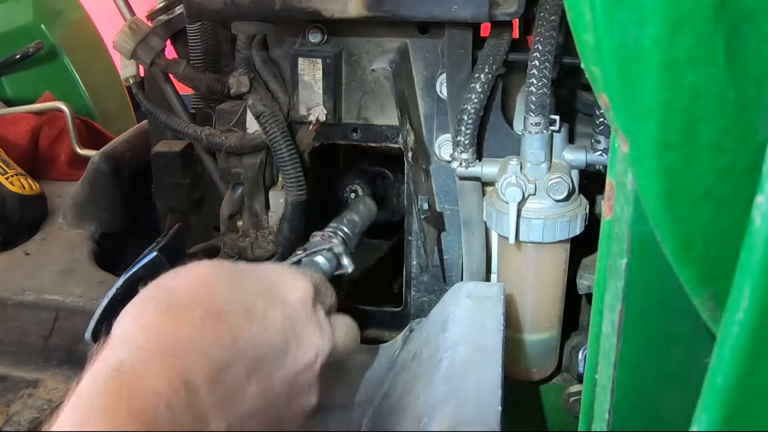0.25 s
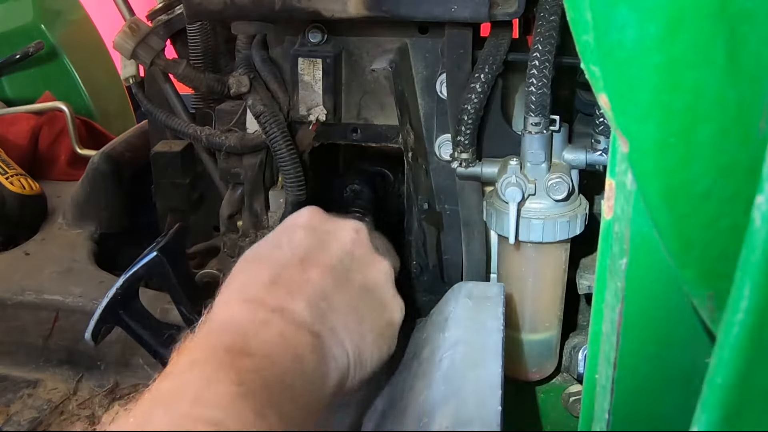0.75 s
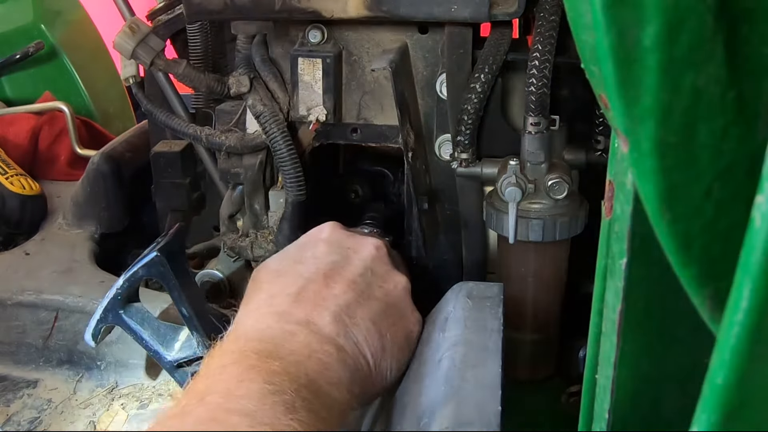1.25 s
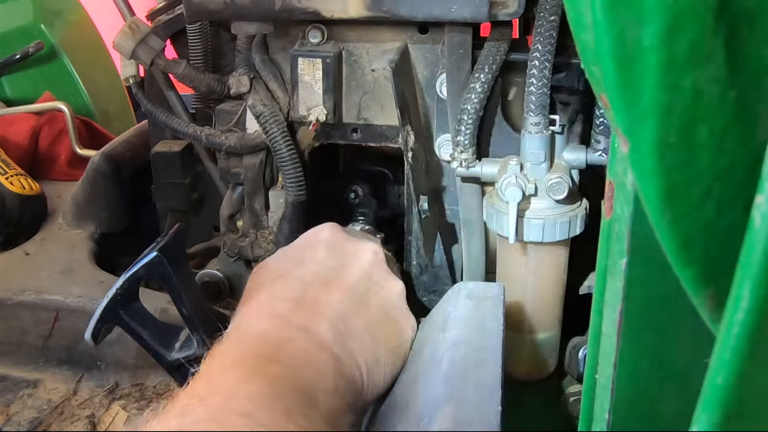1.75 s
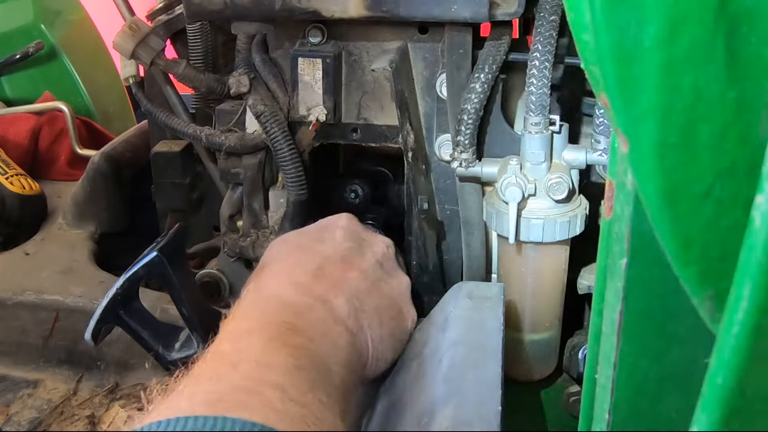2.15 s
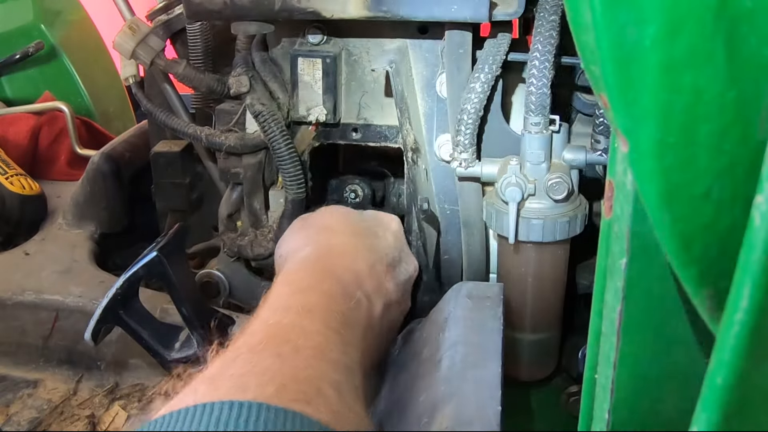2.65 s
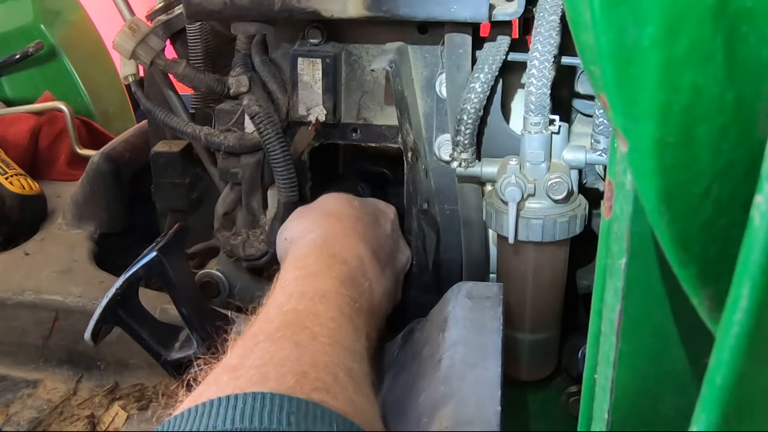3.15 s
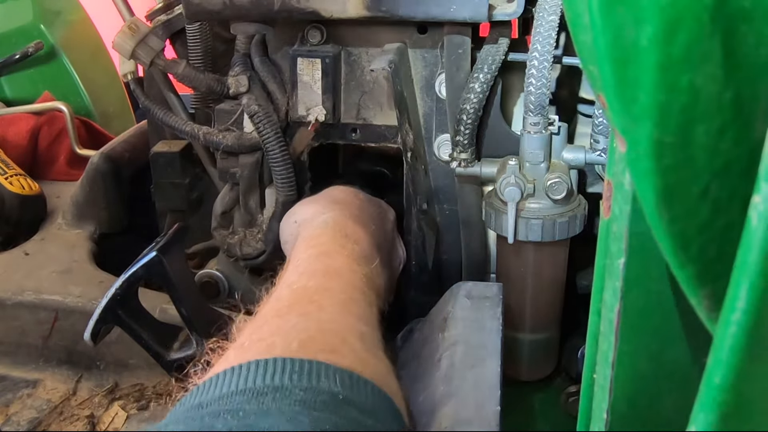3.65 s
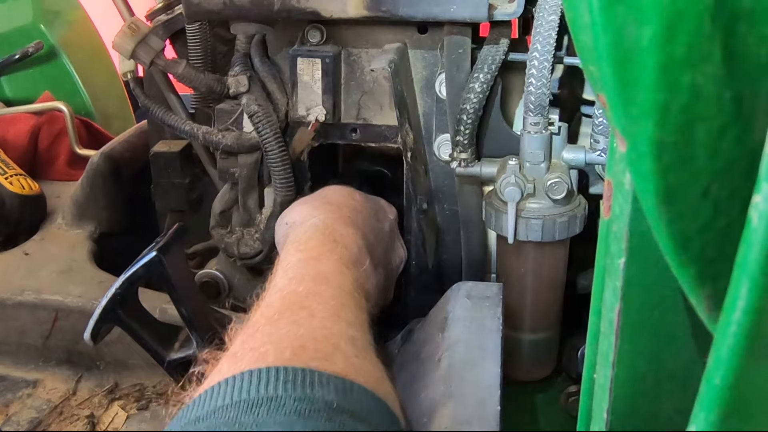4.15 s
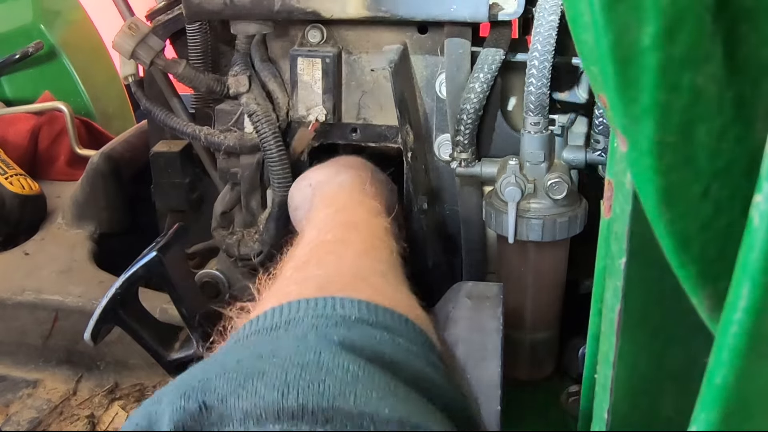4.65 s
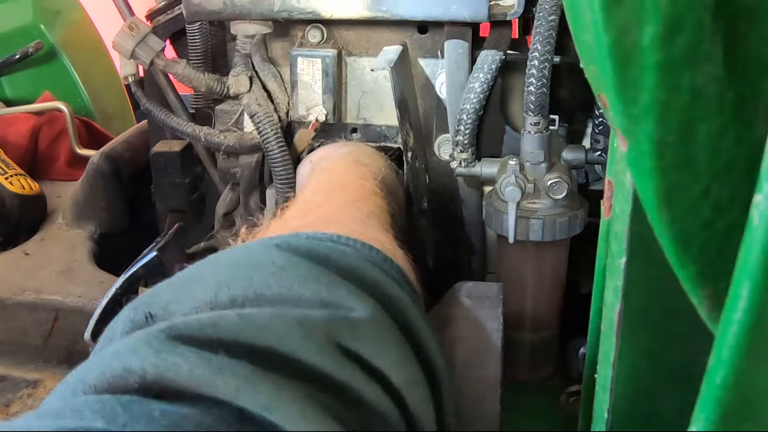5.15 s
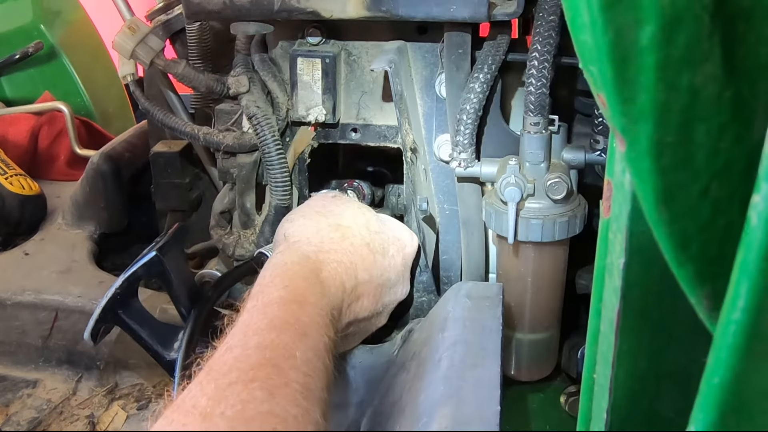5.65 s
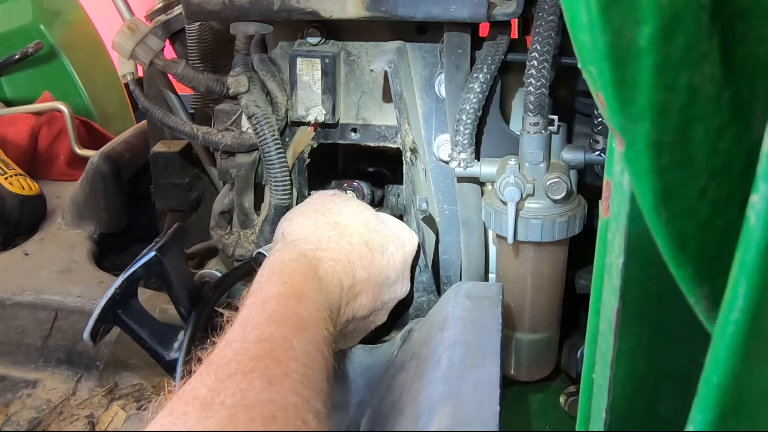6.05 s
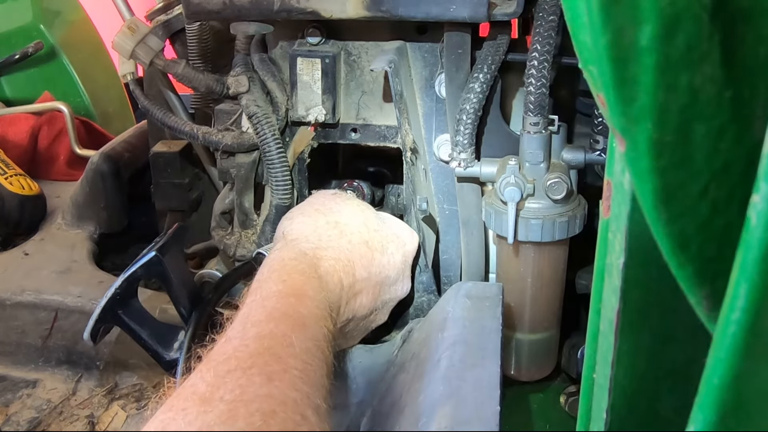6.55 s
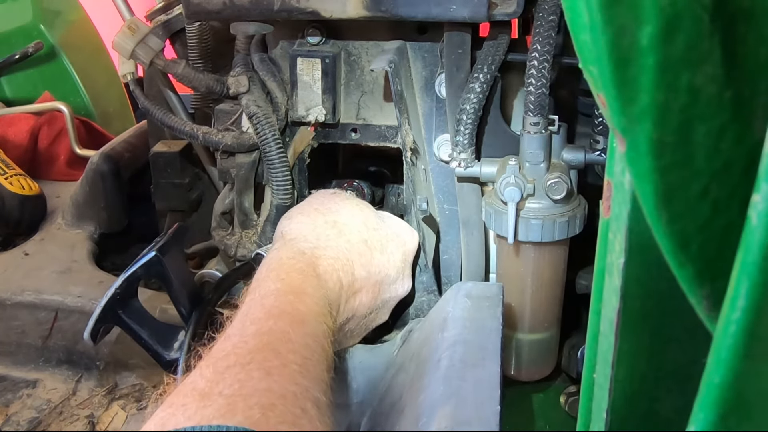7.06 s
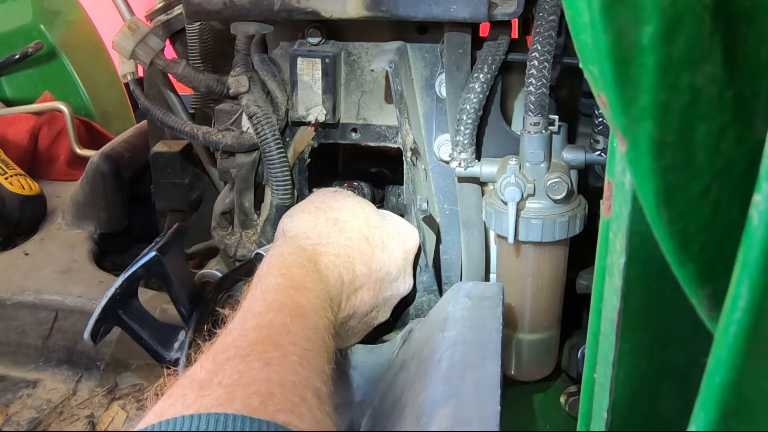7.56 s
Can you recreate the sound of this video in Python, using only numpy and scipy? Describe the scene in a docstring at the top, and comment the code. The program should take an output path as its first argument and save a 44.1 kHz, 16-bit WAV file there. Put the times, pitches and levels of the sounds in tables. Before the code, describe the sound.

Quiet sleeve and hose rustling with small metal ticks and one clank, then a battery grease gun rattles and whines in two bursts.

```python
"""Sleeve and hose rustle first, with small metal ticks, while a hand fits a grease coupler in a shed.
One clank rings the casting; then a battery grease gun runs twice, still going at the end.
Shaped noise makes the rub, rattle, knocks and air puffs; sines make the whine, squeals and casting.
Gears rattle in a plastic shell, the plunger knocks and squeals each stroke, the whine climbs as load eases.
Air puffs on the microphone ports over a far hum; the engine bay and the shed answer the gun and metal."""
import sys
import numpy as np
from scipy import signal
from scipy.fft import rfft, irfft, next_fast_len
from scipy.io import wavfile
from scipy.ndimage import uniform_filter1d, map_coordinates

SR = 44100
rng = np.random.default_rng(int(sys.argv[2]) if len(sys.argv) > 2 else 0)


def generate_wav(signal):
    """Clip the signal to [-1, 1] and save it as 16-bit WAV at the path in sys.argv[1]."""
    frames = np.transpose(np.atleast_2d(signal))
    scaled = np.clip(frames, -1, 1) * 32767
    pcm = np.round(scaled).astype(np.int16)
    wavfile.write(sys.argv[1], SR, pcm)


N = 343803  # samples

# Air puffs on the ports: t/s, level/dB
PUFF_LEVELS = [(0.0, -57), (0.04, -49), (0.13, -53), (0.28, -53), (0.43, -80), (0.87, -65), (0.91, -47.5),
               (1.23, -57), (1.28, -69.5), (2.54, -71.5), (2.89, -59.5), (2.97, -77), (3.03, -62.5),
               (3.32, -64), (3.36, -56), (3.84, -61.5), (3.88, -47), (4.04, -57), (4.1, -49.5), (4.23, -73),
               (4.32, -48.5), (4.45, -68), (6.01, -56.5), (6.12, -69), (6.16, -55), (7.05, -71),
               (7.16, -55.5), (7.68, -70), (7.75, -47), (7.79, -73)]
# Spectrum of the puffs: f/Hz, level/dB
PUFF_SPECTRUM = [(8.8, -27), (15, -7.5), (32, 1.5), (76, -1), (89, -2.5), (113, -19), (140, -4.5),
                 (180, -17.5), (230, -31), (310, -120)]
# Spectrum of the far hum of the yard: f/Hz, level/dB
HUM_SPECTRUM = [(59, -44), (100, -26), (117, -17), (157, -5), (252, -12.5), (289, -12), (325, -27),
                (345, -23), (502, -34), (804, -17.5), (998, -33.5), (1370, -23), (1700, -49), (3500, -46.5),
                (6860, -47), (9500, -55), (11000, -55.5), (14300, -85), (22000, -120)]
# Left-right likeness of the hum: f/Hz, likeness
HUM_ALIKE = [(60, 0.32), (240, 0.58), (950, -0.64), (3770, -0.17), (15000, -0.82)]
HUM_DB = -58.5
# Each dB above calm leans a puff this many dB to the right port, up to a limit
CALM_DB, LEAN, MOST_DB = -70.5, .55, 12

# Sleeve and hose rubbing, two spells: t/s, dull rub level/dB, fine rustle level/dB
RUB_SPELLS = [
    [(0, -58.5, -63.5), (.12, -59.5, -60), (.3, -62.5, -65), (.46, -57.5, -59), (.56, -56.5, -59.5),
     (.585, -43.5, -50.5), (.64, -52.5, -52.5), (.74, -55, -61), (.85, -66.5, -72), (.91, -54, -62.5),
     (1.03, -68, -76.5), (1.12, -57, -72)],
    [(1.27, -60, -59), (1.5, -65.5, -73), (1.72, -55.5, -58), (1.88, -60, -65), (2.02, -56, -58.5),
     (2.16, -58, -58), (2.22, -63, -68), (2.37, -58.5, -57), (2.52, -65, -63.5), (2.65, -61.5, -63.5),
     (2.82, -55.5, -58), (2.93, -61, -66), (2.965, -45.5, -47), (3.05, -65, -70.5), (3.18, -64.5, -77),
     (3.27, -60.5, -66.5), (3.33, -67, -74), (3.38, -64, -67), (3.43, -68, -75), (3.55, -69, -75),
     (3.6, -65, -66), (3.7, -67, -74), (3.8, -67.5, -78), (3.87, -71, -72), (3.95, -77, -81),
     (4.22, -73.5, -83.5), (4.4, -71.5, -73.5), (4.6, -60.5, -69), (4.79, -69.5, -74), (4.86, -57.5, -53.5),
     (4.96, -68, -71), (5.08, -71.5, -83.5), (5.28, -72, -82)],
]
# Spectrum of the dull rub: f/Hz, level/dB
DULL_SPECTRUM = [(150, -25), (250, 2.5), (443, 4.5), (481, -3), (753, -0.5), (1180, -1.5), (1360, 0),
                 (1920, -8.5), (3000, -17.5), (3900, -31.5), (6600, -120)]
# Spectrum of the fine rustle: f/Hz, level/dB
FINE_SPECTRUM = [(880, -1), (1500, -11.5), (1930, -0.5), (2830, -2.5), (4220, -5), (5420, -8.5), (6620, -8),
                 (7190, -14.5), (9790, -14), (11000, -23), (12500, -29), (14300, -48.5), (22000, -120)]
# Left-right likeness of the rubbing: f/Hz, likeness
RUB_ALIKE = [(60, 0.75), (180, 0.92), (550, 0.47), (1650, 0.049), (4970, 0.53), (15000, -0.63)]
# Faint late stir of the sleeve: from t/s, to t/s, dull level/dB, fine level/dB
SLEEVE_STIR = (6, 17, -75.5, -80)

# Metal ticks of the coupler: t/s, level/dB, centre f/Hz
METAL_TICKS = [(.127, -51, 900), (.195, -57, 5160), (.338, -52, 700), (.472, -54, 1280),
               (0.572, -42.5, 1210), (0.885, -53, 1920), (1.077, -59, 970), (1.48, -54, 870),
               (1.698, -55, 6100), (1.722, -53, 7400), (2.025, -55, 4000), (2.813, -58, 4940),
               (2.954, -44.5, 1500), (2.964, -41.5, 3620), (2.975, -52, 860), (3.073, -57, 3660),
               (3.138, -66, 4000), (3.153, -63, 4960), (3.207, -65, 3000), (3.227, -59, 2190),
               (3.305, -62, 3150), (3.456, -59, 4640), (3.566, -36, 3520), (3.58, -52, 2320),
               (3.623, -46.5, 2260), (3.835, -67, 6500), (4.564, -50.5, 3340), (4.575, -57, 2000),
               (4.813, -58, 4000), (5.028, -59.5, 4300), (6.972, -65, 4000), (1.128, -52, 3000)]
# Coupler striking the casting: t/s, reference level/dB for ring and contacts
COUPLER_CLANK = [(1.1378, -11)]
# Ringing modes of the casting: f/Hz, level/dB, t60/s
CASTING_MODES = [(152.2, -3.5, .12), (406.5, 5.5, 0.064), (850, 0, .05), (1140, 3.5, 0.068),
                 (1450, 0, 0.14), (2474, -2.5, .06), (3360, -9, .04)]
# Spectrum of the gritty contact: f/Hz, level/dB
CONTACT_SPECTRUM = [(100, -18), (200, -3), (500, 2.5), (900, 7), (1400, 4), (2500, 1), (4500, -11.5),
                    (8000, -29), (15000, -56)]
# Chatter after the blow: delay t/s, relative level/dB
COUPLER_RATTLES = [(.004, -6.5), (0.016, -16), (0.027, -20.5), (.055, -22)]
TICK_S, TICK_CYCLES = 0.014, 23  # tick t60 = a shortest time (s) plus some cycles
CLEAR = 0.38  # share of clear ring in a tick
CONTACT_S = .03  # t60 (s)

# Trigger held: from t/s, to t/s, gear rattle level/dB, trigger click level/dB, faint start relative level/dB
TRIGGER_RUNS = [(5.306, 6.64, -31, -21.5, -13), (7.324, 7.9, -31, -36, -11)]
# Resonances of the plastic shell: f/Hz, width f/Hz, level/dB
SHELL_MODES = [(1030, 530, -7.5), (982, 200, -8.5), (1765, 60, -1.5), (2175, 110, -2.5), (2516, 110, 0),
               (3210, 450, 2), (3860, 190, -6), (4980, 90, -1.5), (5560, 46, -7.5), (6810, 180, -4),
               (8150, 120, -5), (9900, 150, 0)]
# Spectrum of the gear rattle: f/Hz, level/dB
GEAR_SPECTRUM = [(240, -30.5), (400, -13), (816, -4), (964, 2), (1880, -7), (2150, -5), (2790, -9),
                 (3240, -8), (4390, -8), (5600, -7.5), (6710, -7.5), (7700, -14.5), (10400, -17.5),
                 (15000, -37)]
# Rattle through one stroke: share of stroke, level/dB, treble relative level/dB
STROKE_GRIND = [(0, -1, 0), (.15, -4, 2), (.3, -0.5, -3), (.6, -1.5, -4.5), (.9, -0.5, -3.5), (1, -5, 1)]
# Whine through one stroke: share of stroke, shaft f/Hz, shaft level/dB, 12th and 15th order level/dB
STROKE_WHINE = [(0, 345, -51, -40, -58), (.1, 341, -56, -54, -58), (.3, 318, -58, -60, -56),
                (.47, 326, -50, -58, -43), (.6, 332, -47, -48, -39), (.72, 337, -46, -37, -43),
                (.8, 340, -46, -39, -48), (.9, 345, -47, -34, -54), (1, 345, -51, -40, -58)]
# Plunger turns: t/s, knock level/dB, squeal level/dB, first f/Hz, second f/Hz, length of each squeal t/s
PLUNGER_TURNS = [(5.409, -43.5, -28.5, 4786, 4790, 0.053), (5.644, -10, -29.5, 5780, 5220, 0.037),
                 (5.869, -8.5, -30.5, 5740, 5400, 0.026), (6.089, -7, -31, 5680, 5310, 0.035),
                 (6.307, -6.5, -33.5, 5580, 5350, 0.03), (6.526, -9.5, -32, 5700, 5210, 0.025),
                 (7.504, -8, -31.5, 5680, 5350, 0.034), (7.729, -10, -32.5, 5640, 5250, 0.038)]
# Slack in the drive knocking between turns: t/s, level/dB
SLACK_KNOCKS = [(5.383, -28.5), (5.741, -10.5), (5.775, -16), (5.934, -16), (5.959, -16.5), (6.018, -30),
                (6.058, -8), (6.152, -16.5), (6.177, -13.5), (6.361, -13.5), (6.586, -16), (7.574, -24.5),
                (7.708, -16)]
# Spectrum of the knocks: f/Hz, level/dB
KNOCK_SPECTRUM = [(260, -40), (360, -10.5), (700, -5.5), (1200, 2), (2200, -13), (4000, -19), (9000, -42)]
# Motor climbing to speed: t/s, length t/s, from f/Hz, to f/Hz, level/dB
MOTOR_RUN_UP = [(5.369, 0.031, 2873, 3860, -33), (7.365, .04, 2150, 2550, -36)]
SPIN_UP_S, START_DULL_DB, COAST_DB_PER_S = 0.047, -8, 597.5  # the rattle starts faint and dull, stops fast
FULL_SPEED_S = 0.18  # after the trigger
STROKE_S = .22
FLEX = .012  # the grip squeezes the shell: its resonances wander by this share either way
SQUEAL_LAG_S, SECOND_AT = .011, .6  # the second squeal starts at this share of the first
SAG = .008  # share of its pitch a squeal loses
THIN_HZ, THIN_DB = 6550, -8  # a thin high voice, relative to the squeal
TURN_S, SLACK_S = 0.062, .035  # t60 of the knocks (s)
CLATTER_DB, CLATTER_SPREAD_DB = -16, 12  # faint chance knocks: the loudest, the range below

# Dying time of the engine bay close by: f/Hz, t60/s
BAY_DECAY = [(200, 0.047), (1000, 0.035), (8000, 0.14)]
# Left-right likeness of the bay: f/Hz, likeness
BAY_ALIKE = [(250, 1), (600, 0), (2500, 0.1), (4000, -0.0056), (6000, -0.12), (10000, 0)]
# Dying time of the shed: f/Hz, t60/s
SHED_DECAY = [(200, 0.3), (500, .22), (1000, 0.29), (1800, .38), (3000, 0.49), (5000, .48), (8000, 0.36),
              (15000, 0.21)]
# Left-right likeness of the shed: f/Hz, likeness
SHED_ALIKE = [(200, 1), (600, 0.57), (3000, 0.2), (7000, 0)]
# Where gun and coupler are heard: f/Hz, left minus right level/dB
GUN_SIDE = [(60, -5), (150, 2), (380, -1), (950, -3), (2380, -0.5), (5980, -3), (15000, 5.5)]
# The arm shades the straight path of the rattle: f/Hz, level/dB
ARM_SHADE = [(300, 9), (800, -2), (2500, -2), (3600, -2), (5500, -5), (10000, -23)]
TAIL_CYCLE_S = .8  # several random echo tails take turns, coming round after this time, for an even reverberation
# Brief dip of the whole sound: from t/s, to t/s
BRIEF_DIP = (5.285, 5.294)
TOP_HZ = 15600


def amp(db):
    """Decibels to linear gain."""
    return 10 ** (np.asarray(db) / 20)


def unit(x):
    """Scale to rms 1."""
    return x / np.sqrt(np.mean(x ** 2) + 1e-20)


def along(points, hz):
    """Read (Hz, value) points on a log axis."""
    f, v = np.transpose(points)
    return np.interp(np.log(hz + 1), np.log(f + 1), v)


def curves(rows):
    """One value per sample for each column after the time."""
    s, *cols = np.transpose(rows)
    return [np.interp(np.arange(N) / SR, s, c) for c in cols]


def wobble(rate):
    """A smooth random curve, rate knots a second."""
    knots = rng.standard_normal(int(N * rate / SR) + 4)
    return map_coordinates(knots, [np.arange(N) * rate / SR])


def filtered(x, response):
    """Shape x by a response of frequency."""
    m = next_fast_len(N + SR // 2)
    return irfft(rfft(x, m) * response(np.fft.rfftfreq(m, 1 / SR)), m)[..., :N]


def causal(gain):
    """Minimum-phase response with this gain: it starts no earlier than the blow."""
    def response(hz):
        cep = irfft(np.log(gain(hz) + 1e-6))
        cep[1:len(cep) // 2] *= 2
        cep[len(cep) // 2 + 1:] = 0
        return np.exp(rfft(cep))
    return response


def paired(pair, alike):
    """Mix two unrelated signals to left and right of a given likeness."""
    def weights(hz):
        angle = np.arccos(np.clip(along(alike, hz), -1, 1)) / 2
        return np.array([np.cos(angle), np.sin(angle)])
    mid, side = filtered(pair, weights)
    return np.array([mid + side, mid - side])


def rush(spectrum, alike, grain_db, grain_rate, patchy_db):
    """Stereo noise of rms 1 that flickers in grains and in patches of time and pitch."""
    z = signal.stft(rng.standard_normal((2, N)), nperseg=512)[2]
    field = uniform_filter1d(rng.standard_normal(z.shape[1:]), size=5, axis=0)
    field = uniform_filter1d(field, size=10, axis=1)
    patchy = signal.istft(z * amp(patchy_db * unit(field)), nperseg=512)[1][:, :N]
    pair = patchy * amp(grain_db * wobble(grain_rate))
    coloured = filtered(pair, lambda hz: amp(along(spectrum, hz)))
    return unit(paired(coloured, alike))


def bursts(rows, t60s):
    """Noise that starts at once and dies exponentially, at each (s, dB)."""
    out, t = np.zeros(N + SR), np.arange(SR // 8) / SR
    noise = rng.standard_normal((len(rows), len(t)))
    for (s, db), t60, n in zip(rows, t60s, noise):
        out[round(s * SR):][:len(t)] += amp(db - 60 * t / t60) * n
    return out[:N]


def air():
    """Low noise in lumpy puffs that lean to the right port as they swell, over the far hum."""
    db, = curves(PUFF_LEVELS)
    lumps_db = db + 3 * wobble(7.2)
    pan_db = -np.clip(LEAN * (lumps_db - CALM_DB), 0, MOST_DB)
    puffs = amp(lumps_db + np.outer([1, -1], pan_db) / 2)
    puffs = puffs * rush(PUFF_SPECTRUM, [(30, 0.035)], grain_db=-1.5, grain_rate=37, patchy_db=-0.6)
    hum_level = amp(HUM_DB + 1.6 * wobble(6.1))
    hum = hum_level * rush(HUM_SPECTRUM, HUM_ALIKE, grain_db=2.5, grain_rate=20, patchy_db=1.93)
    return puffs + hum


def rubbing():
    """Cloth and hose friction: a dull rub and a fine grainy rustle, both swelling with the movement."""
    t = np.arange(N) / SR
    during = lambda a, b: uniform_filter1d((t >= a) * (t < b) * 1., size=1500)
    moving = sum(during(spell[0][0], spell[-1][0]) for spell in RUB_SPELLS)
    start, stop, stir_dull_db, stir_fine_db = SLEEVE_STIR
    stir = during(start, stop)
    dull_db, fine_db = curves(sum(RUB_SPELLS, []))
    drag_db = 1.2 * wobble(14)  # the cloth catches and lets go
    dull = rush(DULL_SPECTRUM, RUB_ALIKE, grain_db=2.0, grain_rate=120, patchy_db=2.5)
    fine = rush(FINE_SPECTRUM, RUB_ALIKE, grain_db=1.0, grain_rate=150, patchy_db=1.5)
    dull = (moving * amp(dull_db) + stir * amp(stir_dull_db)) * dull
    fine = (moving * amp(fine_db) + stir * amp(stir_fine_db)) * fine
    return amp(drag_db) * (dull + fine)


def metal_ticks():
    """Small contacts: band noise with a little clear ring, higher ones dying sooner."""
    out, t = np.zeros(N + SR), np.arange(SR // 4) / SR
    noise = rng.standard_normal((len(METAL_TICKS), len(t)))
    noise[:, 0] = 6  # a hard first contact
    for (s, db, hz), n in zip(METAL_TICKS, noise):
        edges = [hz / 2.5, min(hz * 1.34, SR / 2.5)]
        band = signal.butter(4, edges, "bandpass", fs=SR, output="sos")
        click = (1 - CLEAR) * unit(signal.sosfilt(band, n))
        ring = 2 * CLEAR * np.sin(2 * np.pi * hz * t)
        fade = amp(db - 60 * t / (TICK_S + TICK_CYCLES / hz))
        out[round(s * SR):][:len(t)] += fade * (click + ring)
    return out[:N]


def casting_clank():
    """One blow rings the casting's modes, with a gritty contact and a short chatter after it."""
    t = np.arange(SR // 4) / SR
    (s, db), = COUPLER_CLANK
    modes = sum(amp(level - 60 * t / t60) * np.sin(2 * np.pi * hz * t) for hz, level, t60 in CASTING_MODES)
    rung = np.zeros(N)
    rung[round(s * SR):][:len(t)] = amp(db - 19.5) * modes
    contacts = [(s, db + 4.5)]
    contacts += [(s + later, db + 6.5 + less_db) for later, less_db in COUPLER_RATTLES]
    blow = bursts(contacts, [CONTACT_S] * len(contacts))
    return rung + filtered(blow, causal(lambda hz: amp(along(CONTACT_SPECTRUM, hz))))


def housing(hz):
    """Gain of the plastic shell's resonances."""
    return 1 + sum(amp(db) / (1 + (2 * (hz - c) / w) ** 2) for c, w, db in SHELL_MODES)


def gear_shell(hz):
    """Gear noise through the shell, which is too small to radiate bass."""
    return amp(along(GEAR_SPECTRUM, hz)) * housing(hz) / (1 + (320 / (hz + 1)) ** 6)


def run_state():
    """Level of the rattle, how slow the start still is, and whether the motor is at full speed."""
    t = np.arange(N) / SR
    level, lazy, loaded = np.zeros(N), np.zeros(N), np.zeros(N)
    for start, stop, db, _, start_db in TRIGGER_RUNS:
        slow = (t > start) * np.clip(1 - (t - start - .02) / SPIN_UP_S, 0, 1)
        coast_db = COAST_DB_PER_S * np.clip(t - stop, 0, 1)
        level += (t > start) * amp(db + start_db * slow - coast_db)
        lazy += slow
        loaded += (t > start + FULL_SPEED_S) * (t < stop - .025)
    return level, lazy, loaded


def through_stroke(rows):
    """Read a table of stroke shares, each stroke timed from the nearest plunger turn."""
    t = np.arange(N) / SR
    turns = np.transpose(PLUNGER_TURNS)[0]
    nearest = turns[np.searchsorted((turns[1:] + turns[:-1]) / 2, t)]
    place = (t - nearest) / STROKE_S % 1
    share, *cols = np.transpose(rows)
    return [np.interp(place, share, c) for c in cols]


def gear_rattle(level, lazy):
    """Loose teeth chatter unevenly in a shell whose resonances shift with the grip."""
    grind_db, treble_db = through_stroke(STROKE_GRIND)
    teeth = rng.standard_normal(N) * amp(3 * wobble(350) + 1.6 * wobble(50))
    grip = np.clip(.5 + wobble(14) / 2, 0, 1)

    def in_shell(stretch):
        def response(hz):
            low_share = 1 / (1 + (hz / 2500) ** 6)
            return gear_shell(hz * stretch) * np.sqrt([low_share, 1 - low_share])
        return filtered(teeth, response)
    loose, tight = in_shell(1 + FLEX), in_shell(1 - FLEX)
    body, bright = (unit(x) for x in grip * tight + (1 - grip) * loose)
    return level * amp(grind_db) * (body + amp(treble_db + START_DULL_DB * lazy) * bright)


def motor_whine(loaded):
    """Shaft tone and its 12th and 15th orders, higher as the load eases, at full speed only."""
    hz, shaft_db, *order_dbs = through_stroke(STROKE_WHINE)
    turn = 2 * np.pi * np.cumsum(hz * (1 + .002 * wobble(30))) / SR
    whine = amp(shaft_db + 4 * wobble(35)) * np.sin(turn)
    for order, db in zip((12, 15), order_dbs):
        whine += amp(db - 2.5 + 2.5 * wobble(55)) * np.sin(order * turn)
    return uniform_filter1d(loaded, size=400) * whine


def squeals():
    """Stick-slip of the plunger seal: wavering tones and a scrape under smooth swells; motor run-up glides."""
    t = np.arange(N) / SR
    tones, swells, rough = np.zeros(N), np.zeros(N), wobble(160)
    for s, _, db, first_hz, second_hz, length in PLUNGER_TURNS:
        voices = (0, first_hz, db), (SECOND_AT, second_hz, db - 1), (0, THIN_HZ, db + THIN_DB)
        for lag, voice_hz, voice_db in voices:
            u = np.clip((t - s - SQUEAL_LAG_S) / length - lag, 0, 1)
            swell = amp(voice_db) * np.sin(np.pi * u)
            phase = 2 * np.pi * np.cumsum(voice_hz * (1 - SAG * u) + 95 * rough) / SR
            tones += swell * np.sin(phase)
            swells += swell
    for s, length, from_hz, to_hz, db in MOTOR_RUN_UP:
        u = np.clip((t - s) / length, 0, 1)
        phase = 2 * np.pi * np.cumsum(from_hz + (to_hz - from_hz) * u) / SR
        tones += amp(db) * np.sin(np.pi * u) * np.sin(phase)
    tones *= amp(3.5 * wobble(150) - 2)
    hiss = unit(filtered(rng.standard_normal(N), lambda hz: 1 / (1 + ((hz - 5500) / 800) ** 4)))
    return tones, amp(-7) * swells * hiss


def drive_knocks(loaded):
    """Plunger turns, drive slack, chance clatter and trigger clicks strike the shell."""
    at, size = rng.random((2, 400))
    clatter = [(s, CLATTER_DB - CLATTER_SPREAD_DB * e) for s, e in zip(at * N / SR, size)
               if loaded[int(s * SR)]]
    blows = [row[:2] for row in PLUNGER_TURNS] + SLACK_KNOCKS
    t60s = [TURN_S] * len(PLUNGER_TURNS) + [SLACK_S] * len(SLACK_KNOCKS)
    strikes = bursts(blows, t60s) + bursts(clatter, [.025] * len(clatter))
    knocks = filtered(strikes, causal(lambda hz: amp(along(KNOCK_SPECTRUM, hz)) * housing(hz)))
    clicks = bursts([(row[0], row[3]) for row in TRIGGER_RUNS], [.035, .035])
    return knocks + filtered(clicks, causal(lambda hz: gear_shell(hz) / (1 + (hz / 4500) ** 2)))


def grease_gun():
    """The whole gun: its broad noises and its tones come back apart."""
    level, lazy, loaded = run_state()
    squeal, scrape = squeals()
    noises = gear_rattle(level, lazy) + drive_knocks(loaded) + scrape
    return noises, motor_whine(loaded) + squeal


def echo(x, decay, alike, size, count=4):
    """Reverberation: each frequency dies at its own speed; random tails take turns to keep it even."""
    hz, t, z = signal.stft(rng.standard_normal((count, 2, size)), SR, nperseg=256)
    fade = amp(-60 * t / along(decay, hz)[:, None])
    tails = signal.istft(z * fade, SR, nperseg=256)[1]
    cycle = np.arange(N) / SR / TAIL_CYCLE_S - np.arange(count)[:, None] / count
    parts = x * np.clip(np.cos(2 * np.pi * cycle), 0, 1)
    parts = np.pad(parts, ((0, 0), (100, 0)))  # the answer comes 100 samples late
    tails = tails / np.linalg.norm(tails[0, 0])
    wet = signal.fftconvolve(parts[:, None], tails, axes=2).sum(0)[:, :N]
    return paired(wet, alike)


def scene():
    """Gun and coupler, straight and through bay and shed, placed left to right; then rubbing and air."""
    rattle, tones = grease_gun()
    ticks, clank = metal_ticks(), casting_clank()
    shaded = filtered(rattle, causal(lambda hz: amp(along(ARM_SHADE, hz))))
    near = shaded + tones + ticks + amp(-6) * clank
    faint = amp(-9.5) * tones + amp(-10) * ticks  # tones and ticks arrive mostly straight
    to_bay = amp(-3.0) * rattle + faint + amp(-8.5) * clank
    to_shed = amp(-4.5) * rattle + faint + amp(-13.5) * clank
    bay = echo(to_bay, BAY_DECAY, BAY_ALIKE, size=SR // 5)
    shed = echo(to_shed, SHED_DECAY, SHED_ALIKE, size=SR * 2 // 3)
    sides = lambda hz: amp(np.outer([1, -1], along(GUN_SIDE, hz)) / 2)
    return filtered(near + bay + shed, sides) + rubbing() + air()


def record(dry):
    """The level dips briefly before the first run; nothing passes above the band limit."""
    t = np.arange(N) / SR
    start, stop = BRIEF_DIP
    gate = 1 - uniform_filter1d((t > start) * (t < stop) * 1.1, size=150)
    return filtered(dry * gate, lambda hz: hz < TOP_HZ)


dry = scene()
out = record(dry)
generate_wav(out)
```